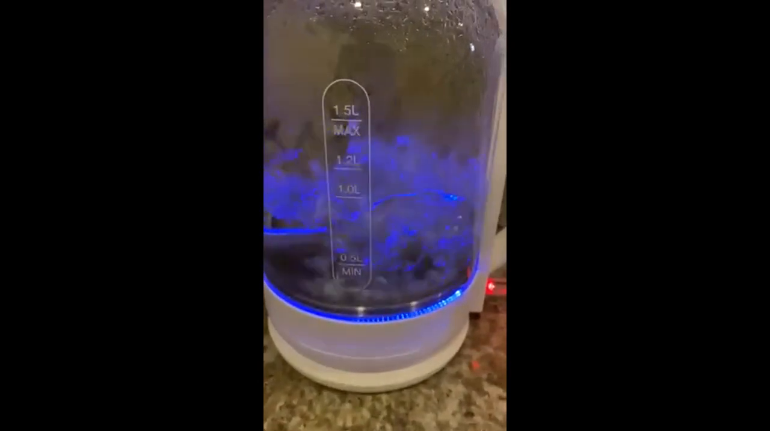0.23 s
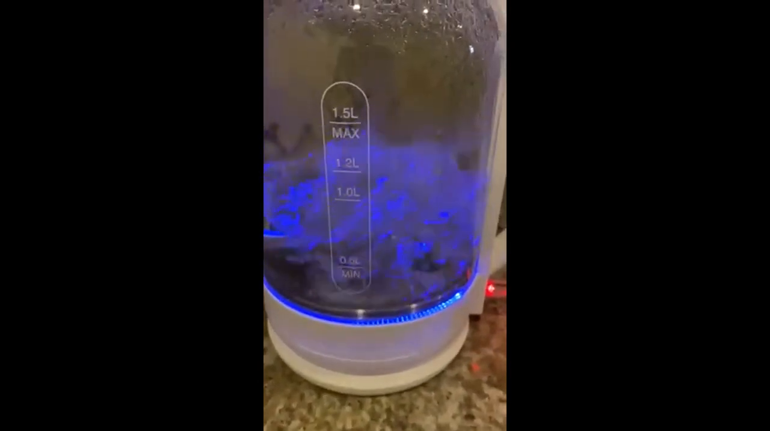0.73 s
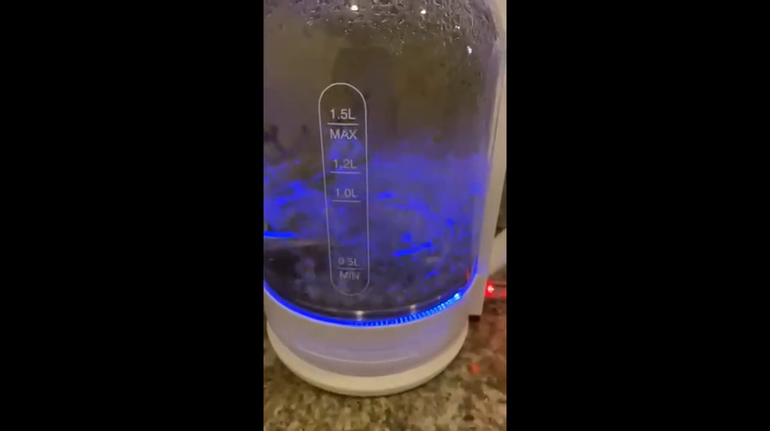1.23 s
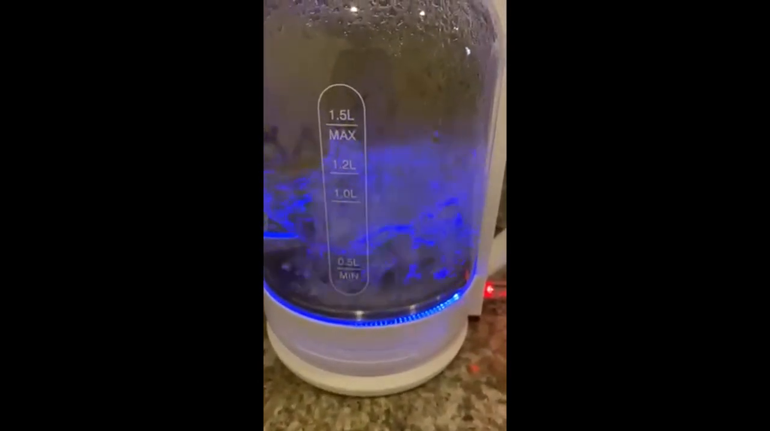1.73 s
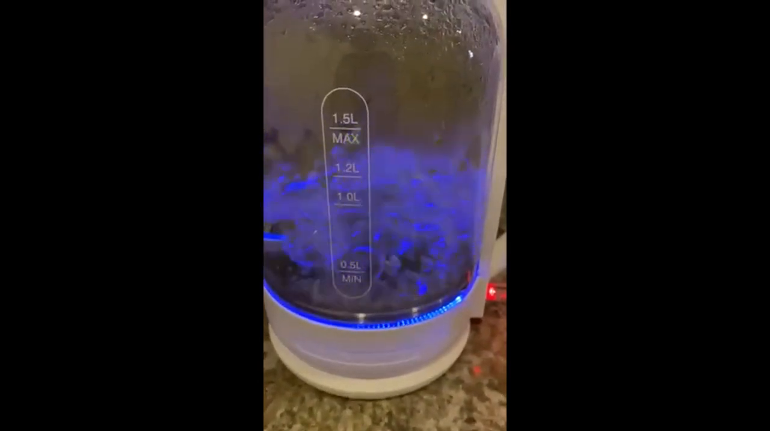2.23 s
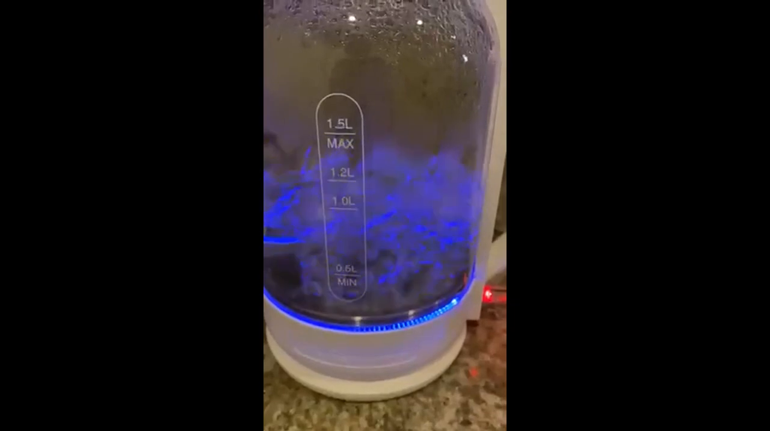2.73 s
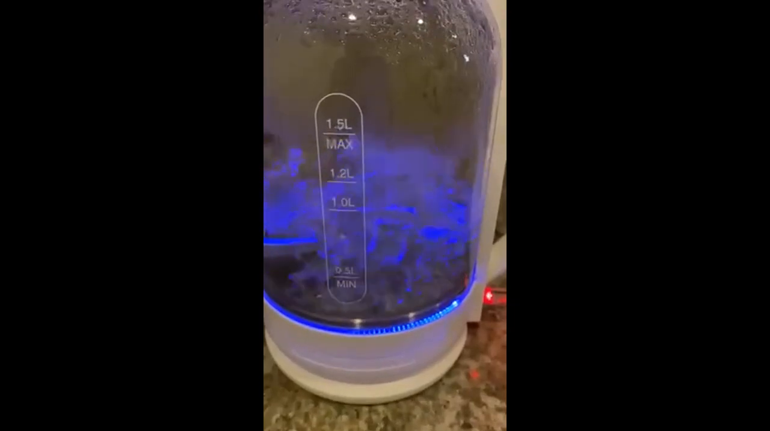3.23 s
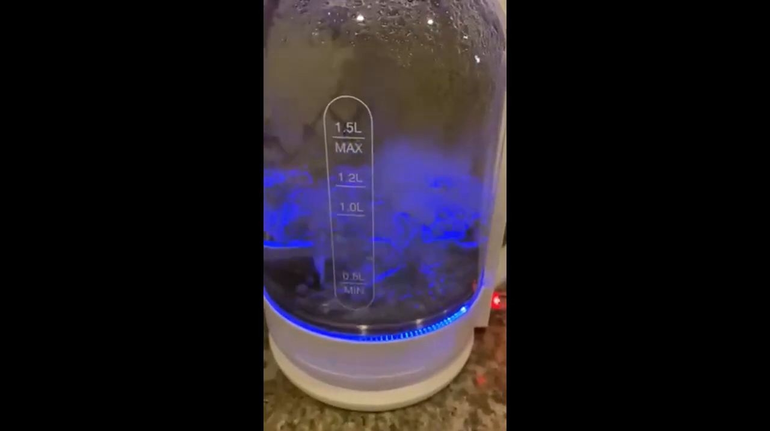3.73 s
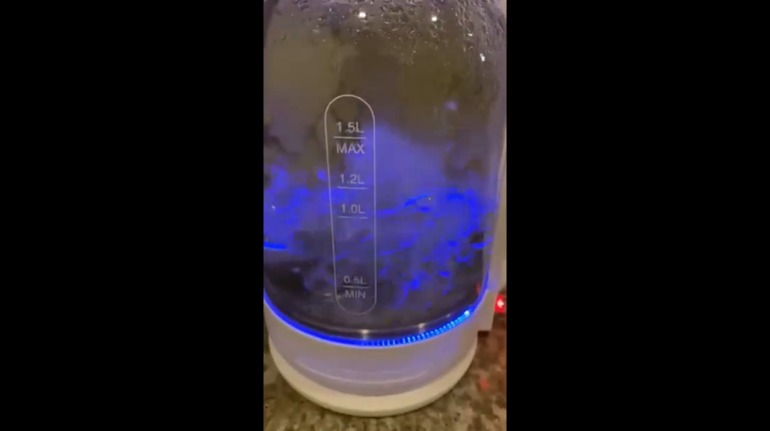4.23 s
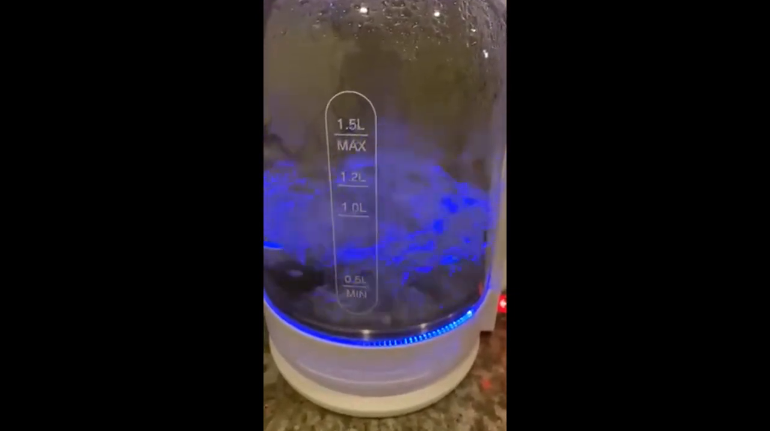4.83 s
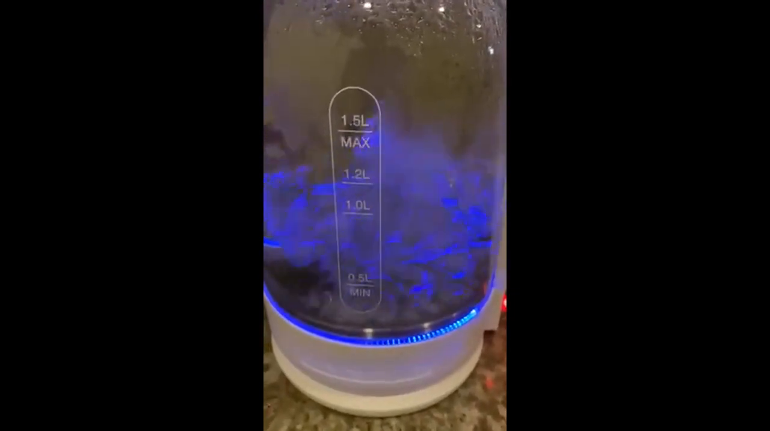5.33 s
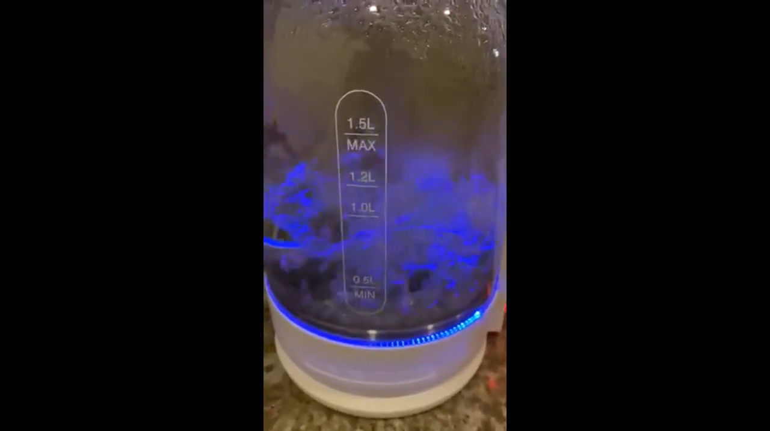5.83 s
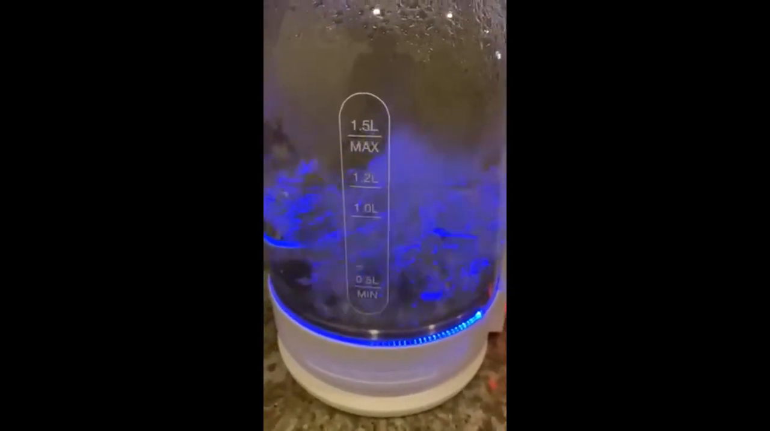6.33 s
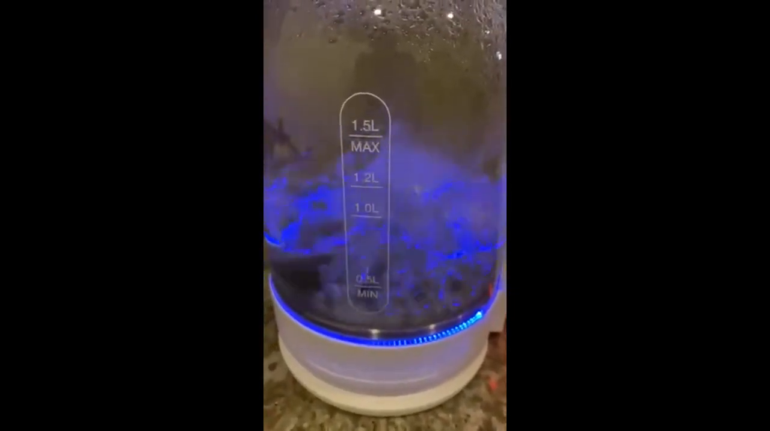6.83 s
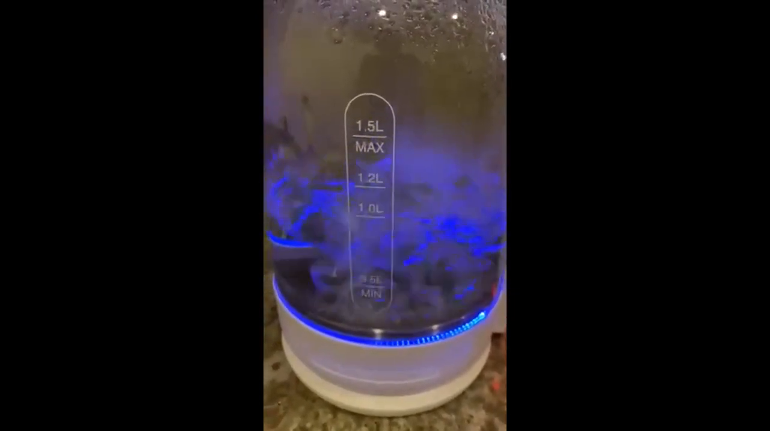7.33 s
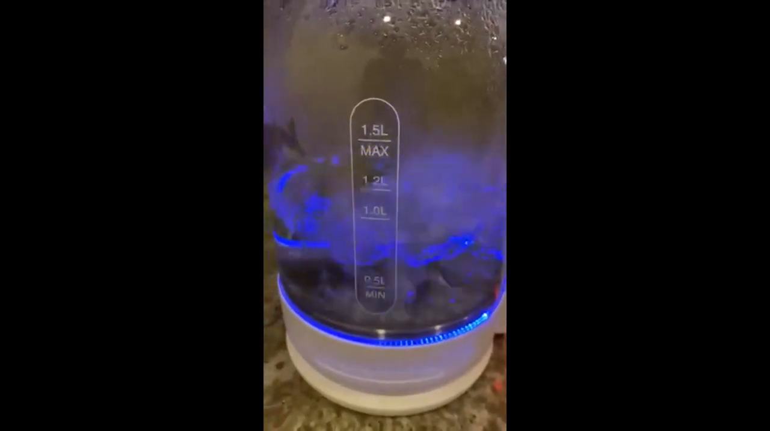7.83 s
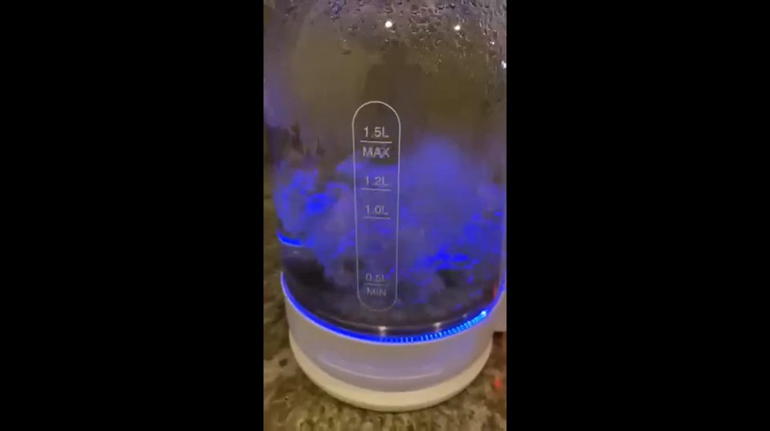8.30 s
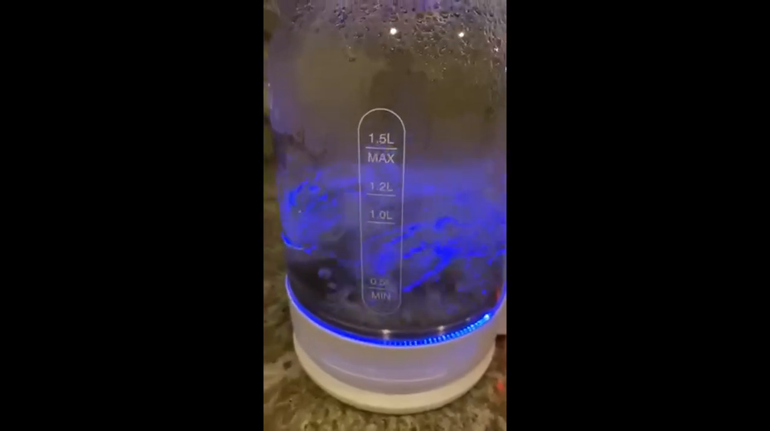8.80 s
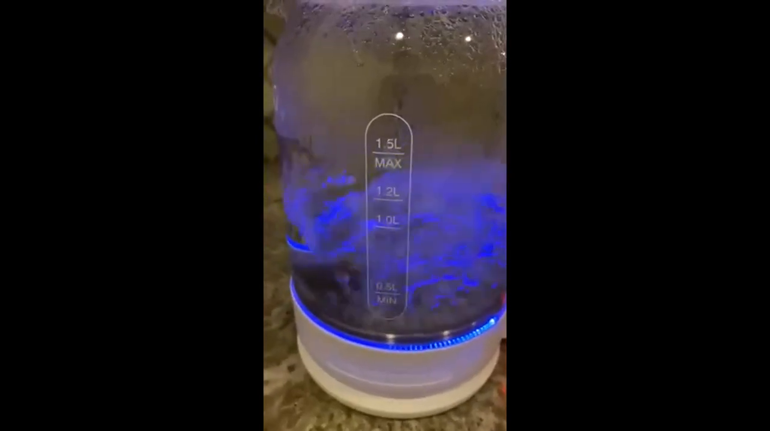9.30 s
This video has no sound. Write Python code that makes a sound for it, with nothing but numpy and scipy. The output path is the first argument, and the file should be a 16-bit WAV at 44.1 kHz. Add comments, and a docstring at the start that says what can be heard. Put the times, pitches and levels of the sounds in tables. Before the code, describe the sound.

Water is at a full rolling boil in a glass electric kettle, heard close up on a phone in a kitchen. From 0 to about 9.5 seconds a deep, dark churning roar runs unbroken, made lumpy by overlapping low thumps as steam pockets collapse several times a second. Dense, wet mid-pitched gurgling sits over it, with occasional higher plops near 0.9, 1.8, 4 and 6.6 s. A thin bright fizz stays faint behind. Short splashes hiss and fade at once, notably around 0, 1.6, 3.2, 4.2, 7.3-7.5 and 8.7 s, some with a crisp drop tick on glass, clearest near 5.5, 7.15 and 8.7 s. The rumble swells slightly around 6 and 7 s, and strong thumps cluster from 7.3 to 7.9 s. Hollow vessel resonance, wide stereo, little echo; still boiling at the end.

```python
"""A low churning roar with bubbling and fizz: water at a full rolling boil in a glass electric kettle,
close to a phone. Steam pockets collapse as low chirped packets, surface bubbles plop as higher ones,
coloured noise fills the gaps, splashes hiss in bands and drops tick on the glass. Resonances ring the
vessel; two microphone ports hear it with different colour and phase."""
import sys
import numpy as np
from scipy import signal
from scipy.fft import rfft, irfft, next_fast_len
from scipy.io import wavfile
from scipy.ndimage import uniform_filter1d, map_coordinates

SR = 44100
rng = np.random.default_rng(int(sys.argv[2]) if len(sys.argv) > 2 else 0)


def dump_mix(stems):
    """Bounce the given channels to the path in sys.argv[1] as a 16-bit WAV at rate SR."""
    frames = np.atleast_2d(stems).T  # one column per channel
    limited = np.clip(frames, -1, 1)  # hard clip at full scale
    pcm = np.round(limited * 32767).astype(np.int16)
    wavfile.write(sys.argv[1], SR, pcm)


def linear_from_db(decibels):
    """Turn decibels (scalar or array-like) into linear amplitude factors; 0 gives 1."""
    return 10 ** (np.asarray(decibels, float) / 20)


N = 421596


def unit(x):
    """Scaled to rms 1."""
    return x / np.sqrt(np.mean(x ** 2) + 1e-20)


def along(points, hz):
    """The columns after Hz, read on a log axis."""
    f, *cols = np.transpose(points)
    return [np.interp(np.log(hz + 1), np.log(f + 1), c) for c in cols]


def filtered(x, response):
    """x times a complex response of frequency."""
    m = next_fast_len(N + SR // 4)
    return irfft(rfft(x, m) * response(np.fft.rfftfreq(m, 1 / SR)), m)[..., :N]


def rush(spectrum, patchy_db, size):
    """Two unrelated noises of joint rms 1 that share colour and time-frequency patches of gain."""
    z = signal.stft(rng.standard_normal((2, N)), nperseg=size)[2]
    field = uniform_filter1d(rng.standard_normal(z.shape[1:]), size=5, axis=0)
    field = uniform_filter1d(field, size=3, axis=1)
    pair = signal.istft(z * linear_from_db(patchy_db * unit(field)), nperseg=size)[1][:, :N]
    return unit(filtered(pair, lambda hz: linear_from_db(along(spectrum, hz)[0])))


def surges(rate, depth_db):
    """Random swells of the heaving water, rate knots a second."""
    knots = rng.standard_normal(int(N * rate / SR) + 8)
    return linear_from_db(depth_db * map_coordinates(knots, [np.arange(N) * rate / SR]))


def blips(rows, turns, rise, scatter_s=.004):
    """Gaussian packets, sigma turns cycles, chirped up by rise; row two holds scattered, shifted twins."""
    half = 400  # samples
    s, db, hz = np.transpose(rows)[:, :, None]
    step = np.arange(-half, half)
    cyc = step / SR * hz
    envelope = linear_from_db(db) * np.exp(-.5 * (cyc / turns) ** 2)
    out = np.zeros((2, N))
    for twin, late_s in zip(out, (0, scatter_s)):
        start, shift = rng.random((len(s), 2)).T[:, :, None]
        wave = envelope * np.cos(2 * np.pi * (cyc + rise * cyc ** 2 + start))
        at = np.round((s + late_s * (2 * shift - 1)) * SR).astype(int) + step
        twin += np.bincount(at.ravel() % N, wave.ravel(), N)
    return out


def crowd(count, db, spread_db, hz, octaves):
    """Random event rows: many small, few large."""
    u = rng.random((count, 2))
    level_db = db - spread_db * np.log(u[:, 1] + .03)
    return np.c_[u[:, 0] * N / SR, level_db, hz * 2 ** (octaves * rng.standard_normal(count))]


def brood(rows, count, drop_db, spread_s, octaves):
    """Mostly softer events scattered around each given one, more of them after it."""
    kin = np.repeat(np.array(rows), count, axis=0)
    u = rng.standard_normal((len(kin), 3))
    late_s = spread_s * (u[:, 0] + .6)
    level_db = kin[:, 1] - drop_db + 2.5 * u[:, 1]
    return np.c_[kin[:, 0] + late_s, level_db, kin[:, 2] * 2 ** (octaves * u[:, 2])]


# vigour of the boil, before heave and ringing: (time [s], level [dB])
BOIL_VIGOUR = [(0.0, -40), (0.5, -36.5), (2.6, -36.5), (3.75, -37), (4.15, -36.5), (5.3, -37.5), (5.9, -35),
               (6.35, -38), (6.95, -35), (7.6, -38.5), (8.55, -38), (9.56, -36)]
# colour of the churning noise: (frequency [Hz], relative level [dB])
CHURN_COLOUR = [(15, -49), (30, -26), (60, -7), (120, -5), (200, -4.5), (280, -9.5), (350, -5), (420, -9.5),
                (520, -12), (750, -26), (1500, -55)]
# steam-pocket collapses placed by hand, loud and soft, before heave and ringing:
# (time [s], peak level [dB], pitch [Hz])
PLACED_COLLAPSES = [(0.085, -24, 332), (0.285, -27, 285), (0.386, -22.5, 342), (0.558, -25.5, 264),
                    (0.838, -19.5, 363), (1.215, -27, 338), (1.254, -25, 300), (1.44, -29.5, 318),
                    (1.642, -25, 260), (2.306, -22, 360), (2.386, -21, 405), (2.428, -26, 240),
                    (2.715, -29, 230), (2.988, -24, 320), (3.078, -23, 338), (3.273, -26, 337),
                    (4.005, -24.5, 244), (4.522, -20.5, 316), (4.814, -19.5, 333), (5.135, -27.5, 302),
                    (5.212, -32, 260), (5.297, -34, 228), (5.496, -28, 235), (5.698, -23.5, 370),
                    (5.877, -24, 334), (6.007, -29, 247), (6.075, -31, 262), (6.118, -24, 306),
                    (6.509, -22.5, 281), (6.66, -27, 355), (6.768, -23, 296), (6.862, -21.5, 357),
                    (6.932, -27, 298), (6.984, -23, 210), (7.335, -23, 320), (7.356, -22.5, 302),
                    (7.43, -19.5, 320), (7.627, -20, 387), (7.729, -20.5, 355), (7.753, -28, 300),
                    (7.832, -21.5, 324), (8.291, -26.5, 248), (8.346, -25, 345), (8.775, -32, 226),
                    (8.937, -26, 310), (9.101, -21, 353), (9.254, -24, 284), (9.524, -26, 218)]


def churn():
    """Steam pockets roll and collapse: low noise under short rising thumps."""
    s, db = np.transpose(BOIL_VIGOUR)
    vigour = linear_from_db(np.interp(np.arange(N) / SR, s, db))
    roar = vigour * rush(CHURN_COLOUR, patchy_db=-0.2, size=1024)
    small = blips(crowd(count=500, db=-34.0, spread_db=2.0, hz=375, octaves=0.37), turns=0.69, rise=0.04)
    shed = brood(PLACED_COLLAPSES, count=2, drop_db=12, spread_s=.012, octaves=0.29)
    small = small + blips(shed, turns=0.83, rise=0.028)
    rows = np.r_[np.array(PLACED_COLLAPSES), crowd(count=12, db=-31, spread_db=1.5, hz=265, octaves=.2)]
    return roar + small + blips(rows, turns=.56, rise=0.027, scatter_s=0.0017)


# colour of the bubbling noise: (frequency [Hz], relative level [dB])
GURGLE_COLOUR = [(300, -13), (560, -3.5), (670, 5.5), (780, -0.5), (870, -3.5), (1050, 2), (1300, -6.5),
                 (1900, -12), (2400, -10), (2800, -18.5), (4000, -28.5), (7000, -75)]
# middling bubbles placed by hand, before heave and ringing: (time [s], peak level [dB], pitch [Hz])
PLACED_GLUGS = [(0.016, -39, 1110), (0.084, -36, 1000), (0.932, -47, 1050), (1.029, -35.5, 1090),
                (1.563, -41, 1040), (1.608, -39, 1080), (1.874, -44, 1110), (2.179, -41, 1220),
                (2.243, -44, 1000), (2.299, -37, 1000), (2.43, -35.5, 1160), (2.473, -36, 845),
                (2.737, -39, 1020), (3.065, -39, 980), (3.114, -39, 1090), (3.161, -41, 1010),
                (3.756, -45, 990), (4.081, -36, 1030), (4.625, -37, 980), (4.789, -46, 1010),
                (5.027, -39.5, 1060), (5.165, -47, 1060), (5.208, -35.5, 1050), (5.271, -40, 1080),
                (5.67, -42, 1050), (5.866, -36, 1130), (6.318, -38.5, 990), (6.551, -41, 960),
                (6.857, -40, 1090), (6.981, -35, 1070), (7.024, -45, 1000), (7.624, -40, 1060),
                (7.647, -41, 1110), (8.298, -41, 1070), (8.342, -41, 1070), (8.4, -40, 900),
                (8.421, -42, 1090), (8.789, -37, 1070)]
# surface bubble plops placed by hand, loud and soft, before heave and ringing:
# (time [s], peak level [dB], pitch [Hz])
PLACED_PLOPS = [(0.919, -44.5, 2750), (1.794, -41.5, 2770), (2.208, -47, 3000), (2.745, -50, 2570),
                (3.98, -43.5, 2240), (4.329, -47, 2470), (4.384, -51.5, 2360), (4.943, -48, 2300),
                (5.331, -49, 2285), (5.74, -47, 2450), (5.865, -51, 1900), (6.122, -49, 2260),
                (6.571, -41.5, 2760), (8.023, -59, 2370), (9.333, -47, 2570), (9.535, -49, 2140)]


def gurgle():
    """Bubbles of every size burst at the surface: rising packets over bubbling noise."""
    noise_db, drift_knots_per_s, drift_db = -48, 4.9, 0.07
    noise = rush(GURGLE_COLOUR, patchy_db=2.0, size=512)
    noise = linear_from_db(noise_db) * surges(drift_knots_per_s, drift_db) * noise
    middling = blips(crowd(count=2200, db=-52.5, spread_db=1.0, hz=1170, octaves=0.3), turns=1.1, rise=0.0017)
    middling = middling + blips(PLACED_GLUGS, turns=1.95, rise=0.0044, scatter_s=.0015)
    shed = brood(PLACED_GLUGS, count=5, drop_db=12, spread_s=.012, octaves=0.43)
    middling = middling + blips(shed, turns=2.8, rise=0.0053)
    small = blips(crowd(count=1000, db=-66.0, spread_db=3.0, hz=2285, octaves=0.275), turns=5.7, rise=0.0011)
    rows = np.r_[np.array(PLACED_PLOPS), crowd(count=10, db=-55, spread_db=1.3, hz=2350, octaves=.05)]
    tone = blips(rows, turns=4.7, rise=.006, scatter_s=0.00116)
    snap_rows = rows * [1, 1, 1.12] + [.0015, -3, 0]  # brighter, later, softer
    snap = blips(snap_rows, turns=3.9, rise=.006, scatter_s=0.00123)
    shed = brood(rows, count=5, drop_db=7, spread_s=.007, octaves=0.14)
    return noise + middling + small + tone + snap + blips(shed, turns=3.9, rise=0.0043)


# colour of the droplet fizz: (frequency [Hz], relative level [dB])
FIZZ_COLOUR = [(1500, -29), (3000, -11), (3700, -7.5), (4500, -4), (5500, -5), (6300, -8.5), (7500, 0),
               (8200, -5), (9800, -6.5), (10500, -8), (11400, -9), (12300, -13), (13900, -15.5),
               (14900, -12), (15600, -16)]
# splashes placed by hand, loud and soft, before ringing:
# (time [s], nominal level [dB], centre of brightness [Hz])
PLACED_SPLASHES = [(0.04, -35, 9400), (0.485, -44, 4800), (0.581, -44, 3620), (0.67, -39.5, 7347),
                   (1.056, -43, 7169), (1.234, -48, 4900), (1.264, -45, 4500), (1.478, -40, 6873),
                   (1.571, -36, 6900), (2.094, -38, 7336), (2.39, -42, 4700), (2.517, -44, 5030),
                   (2.718, -49, 4400), (2.999, -51, 4800), (3.209, -36.5, 6860), (3.266, -41, 3700),
                   (4.191, -35, 9500), (4.506, -40, 7419), (4.527, -39, 4400), (4.697, -41, 5560),
                   (4.905, -44, 7485), (4.953, -39.5, 8100), (5.032, -39.5, 4200), (5.077, -45, 6564),
                   (5.468, -37.5, 5300), (5.704, -41, 7440), (6.298, -43, 4300), (6.35, -40, 4400),
                   (7.156, -48, 4500), (7.237, -43, 4600), (7.259, -35, 7600), (7.53, -34, 8600),
                   (7.808, -49, 5400), (7.837, -47, 4800), (7.316, -43, 6200), (7.378, -44, 7000),
                   (8.016, -38.5, 7457), (8.079, -35.5, 5470), (8.635, -41, 6268), (8.674, -33, 9800),
                   (8.722, -60, 4400), (8.786, -39, 5000), (8.894, -42, 5800), (8.932, -46, 5000),
                   (9.111, -42.5, 5000), (9.332, -38.5, 4640)]
# bands in which a splash can hiss: (centre [Hz], Gaussian sigma [octaves])
HISS_BANDS = [(2500, 0.31), (3400, 0.65), (4900, 0.54), (6600, 0.75), (8900, 0.26), (11500, 0.18)]


def spray(heave):
    """Droplets fizz steadily; each splash hisses in its own band mix, dying fast, then sizzling out."""
    fizz_db, swell_knots_per_s, swell_db, patch_db = -57, 9, 1.3, 3
    rise_s, decay60_s, tail_db, tail60_s, stagger_s = 0.004, 0.045, -15, .14, .0025
    spatter = np.array(PLACED_PLOPS) * [1, 1, 1.1] + [0, -6, 0]  # thrown up by the plops
    rows = np.r_[np.array(PLACED_SPLASHES), spatter,
                 crowd(count=20, db=-48, spread_db=1.3, hz=7300, octaves=.15),
                 crowd(count=350, db=-54.5, spread_db=2.5, hz=7000, octaves=.3)]
    t = np.arange(SR // 10) / SR
    decay = linear_from_db(-60 * t / decay60_s) ** 2 + linear_from_db(tail_db - 60 * t / tail60_s) ** 2
    power_shape = (1 - np.exp(-t / rise_s)) ** 2 * decay
    # bands start unevenly
    stagger = stagger_s * (2 * rng.random((len(rows), len(HISS_BANDS))) - 1)
    starts = np.round(np.abs((rows[:, :1] - rise_s + stagger).T) * SR).astype(int) % N
    # power share per band: nearness to the splash's centre, with random spread
    octave = np.log2(np.array(HISS_BANDS)[:, 0] / rows[:, 2:])
    share = np.exp(-.5 * (octave / 0.5) ** 2) * linear_from_db(4 * rng.standard_normal(octave.shape))
    share /= share.sum(1, keepdims=True)
    fizz = rush(FIZZ_COLOUR, patchy_db=patch_db, size=512)
    out = heave * linear_from_db(fizz_db) * surges(swell_knots_per_s, swell_db) * fizz
    for part, at, (hz, wide) in zip(share.T, starts, HISS_BANDS):
        hits = np.bincount(at, part * linear_from_db(rows[:, 1]) ** 2, N)
        power = signal.fftconvolve(hits, power_shape)[:N]
        band = filtered(rng.standard_normal((2, N)),
                        lambda f: np.exp(-.5 * (np.log2((f + 1) / hz) / wide) ** 2))
        out = out + np.sqrt(np.abs(power)) * unit(band)
    tiny = crowd(count=900, db=-59.5, spread_db=2.5, hz=7120, octaves=0.286)
    return out + blips(tiny, turns=8.8, rise=0.00073)  # tiny bubbles ping


# crisp drops on the glass, before ringing: (first contact [s], click level [dB], pitch [Hz])
DROPS = [(0.4838, -47, 4450), (1.2625, -46, 4300), (1.47, -44, 4240), (1.5698, -45, 5810),
         (3.2071, -42, 6020), (4.1924, -50, 6000), (5.0305, -51, 6040), (5.0739, -42, 6020),
         (5.466, -39, 5200), (6.348, -55, 4270), (7.1544, -39.5, 4300), (7.2345, -46, 4270),
         (7.2574, -46, 4450), (7.5288, -49, 4240), (7.8351, -44.5, 4310), (8.0765, -46.5, 4300),
         (8.6712, -37, 5800), (8.7201, -49, 4300), (8.7864, -44, 4270), (8.8922, -46, 6010),
         (9.3317, -48, 4310)]


def ticks():
    """A drop clicks on the glass, rings for a moment and throws off smaller ones."""
    contact_to_peak_s = .0015
    rows = np.r_[np.array(DROPS) + [contact_to_peak_s, 0, 0],
                 crowd(count=700, db=-62, spread_db=2, hz=5000, octaves=.3)]
    click = blips(rows, turns=0.97, rise=0, scatter_s=.0005)
    ring = blips(rows + [.001, -8, 0], turns=7.5, rise=0, scatter_s=.0005)
    shed = brood(DROPS, count=3, drop_db=15, spread_s=.006, octaves=0.32)
    return click + ring + blips(shed, turns=2.5, rise=0.001)


# resonances of kettle, base and water column, and hollows between: (centre [Hz], width [Hz], boost [dB])
RESONANCES = [(169.3, 21.7, 10), (244, 26.2, 9), (279, 34, -6), (315, 35.4, 5.5), (399.5, 35, 4),
              (440, 28, -3.5), (485, 45, 1), (625, 50, -3), (765, 50, -3), (860, 90, 4), (1113, 52.6, 9),
              (2120, 130, 4), (2285, 70, 5.5), (2510, 82, 6), (3085, 62, 5), (4550, 240, 2),
              (5010, 150, 3.5), (4280, 90, 1.5), (6010, 60, 7), (7500, 300, 2), (8560, 250, 2),
              (9200, 350, 2), (12940, 400, 3.5)]


def kettle(x):
    """The vessel rings along: a sum of second-order band-pass resonances on the direct signal."""
    def response(f):
        return 1 + sum((linear_from_db(db) - 1) * 1j * f * w / (c * c - f * f + 1j * f * w)
                       for c, w, db in RESONANCES)
    return filtered(x, response)


def scene():
    """Row one is direct sound, row two its scattered twin; one heave lifts churn, bubbles and fizz."""
    heave = surges(rate=24, depth_db=0.81)
    return kettle(churn() * heave ** 0.43 + gurgle() * heave + spray(heave) + ticks())


# left port against right: (frequency [Hz], level [dB], phase lead [rad], likeness [0-1])
LEFT_PORT = [(30, .9, -.1, .7), (60, 0, -0.2, .84), (111, -3.5, -.33, 0.97), (168, -17.5, -.3, 0.8),
             (240, -16.5, 0.2, 0.5), (280, -9, 2.13, 0.6), (341, -16.5, 2, 0.6), (412, -5.5, 2.5, 0.94),
             (480, -6.5, 3.5, 0.78), (600, -1.8, 2.5, 0.89), (812, -1.2, 2.5, 0.74),
             (1016, 1.5, 1.64, 0.62), (1115, -2.7, 2.5, 0.81), (1294, 0.2, 2, 0.7), (1590, -1.7, 0.42, 0.4),
             (2300, -.5, 1.29, 0.8), (3000, -1.5, 1.1, 0.3), (4260, -0.8, 0.6, .67), (4900, -1.2, 1.7, 0.5),
             (6330, 0.3, 1.9, .63), (7450, 0, 2.5, 0.85), (8100, 0.5, 3, 0.988), (12300, 0, 3, .991),
             (12640, -0.5, 3.5, .68), (14200, 0.5, 4, .28), (15300, 0, 6.4, .72)]


def ports(hz):
    """What the left port takes from the direct sound and from the scattered twin."""
    db, lead, alike = along(LEFT_PORT, hz)
    alike = np.clip(alike, 0, .999)
    return linear_from_db(db) * np.array([alike * np.exp(1j * lead), np.sqrt(1 - alike ** 2)])


def roll_off(x):
    """The treble ends steeply here."""
    return signal.sosfilt(signal.butter(12, 16610, fs=SR, output="sos"), x)


def record(dry):
    """The right port faces the kettle; the left differs in level and phase; both are band-limited."""
    top_hz = 15740
    left = filtered(dry, ports).sum(0)
    pair = np.array([left, dry[0]])
    mix = filtered(pair, lambda hz: hz < top_hz)
    return roll_off(mix)


dry = scene()
out = record(dry)
dump_mix(out)
```